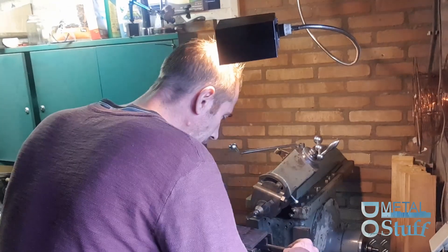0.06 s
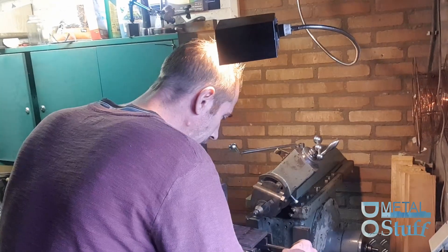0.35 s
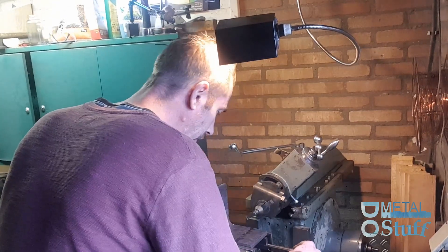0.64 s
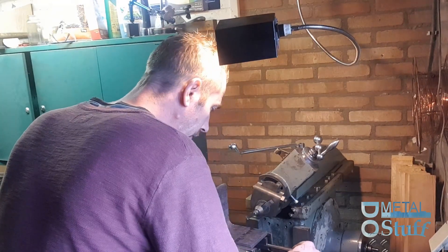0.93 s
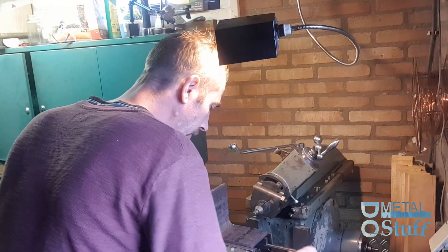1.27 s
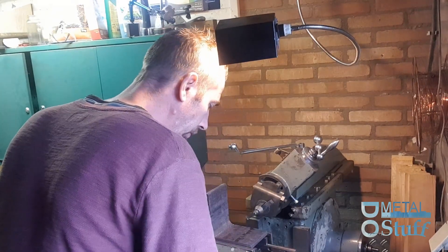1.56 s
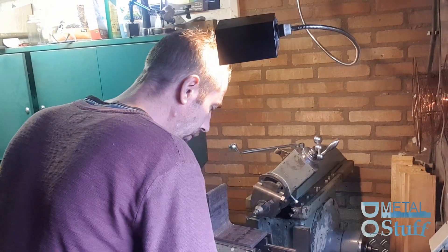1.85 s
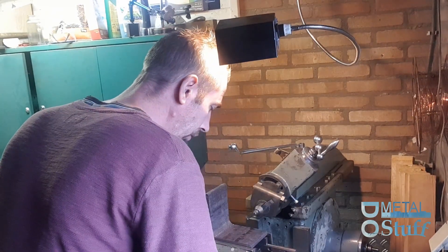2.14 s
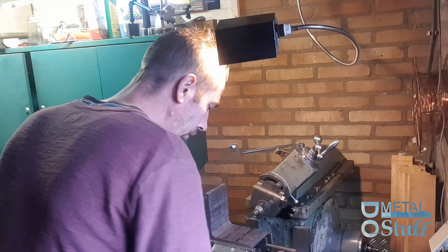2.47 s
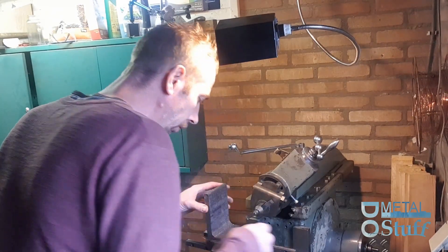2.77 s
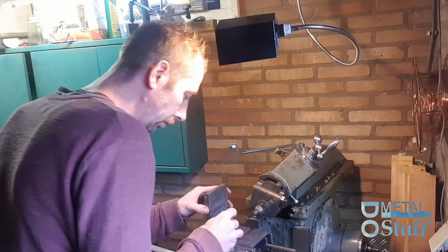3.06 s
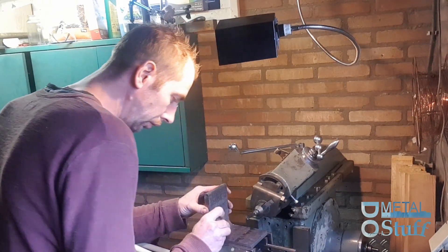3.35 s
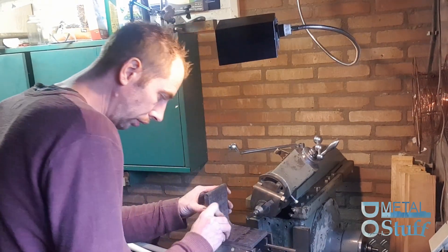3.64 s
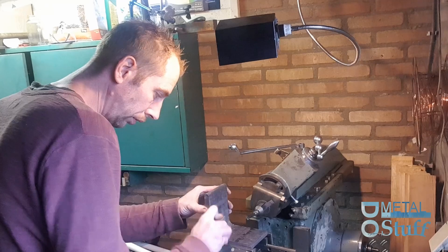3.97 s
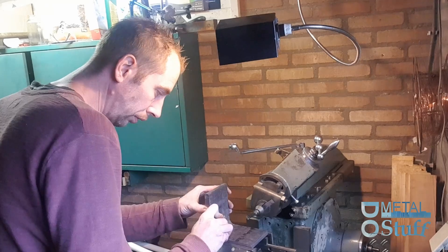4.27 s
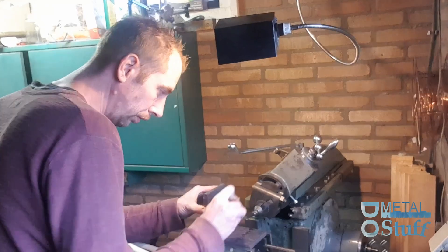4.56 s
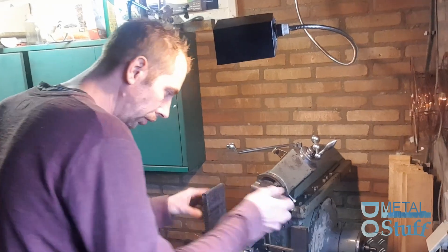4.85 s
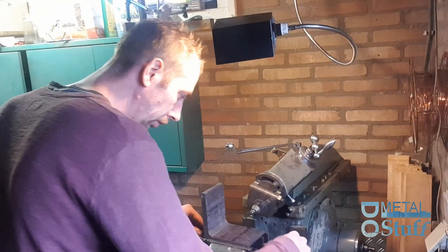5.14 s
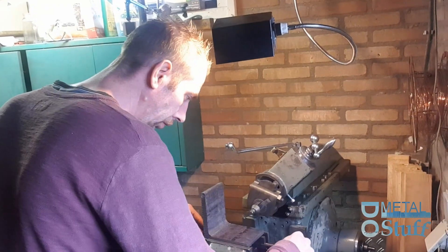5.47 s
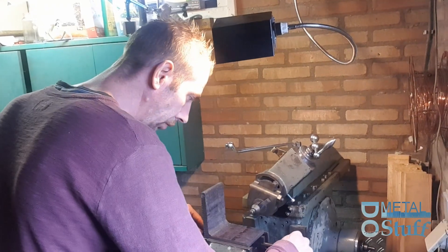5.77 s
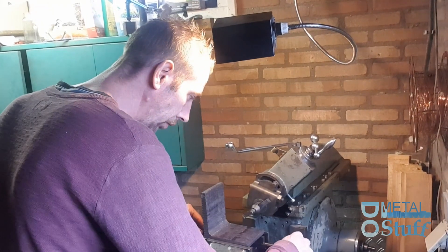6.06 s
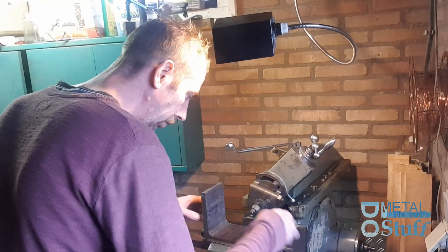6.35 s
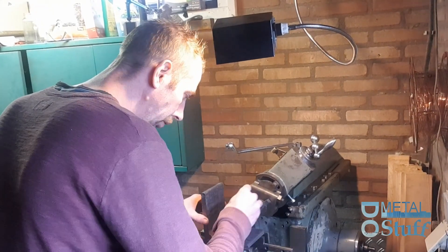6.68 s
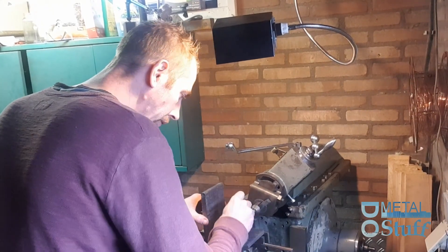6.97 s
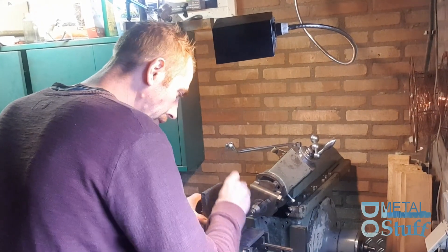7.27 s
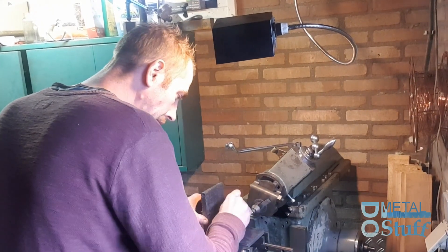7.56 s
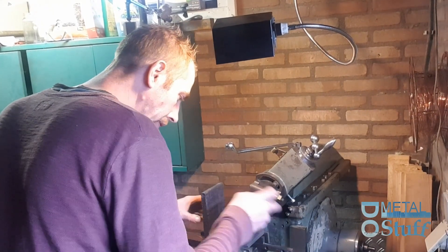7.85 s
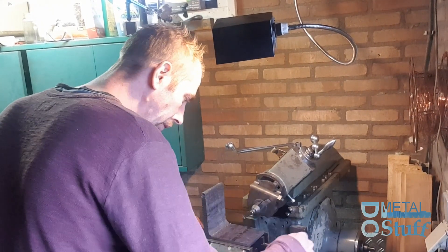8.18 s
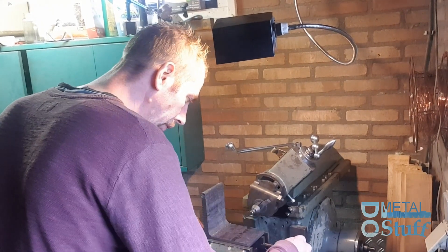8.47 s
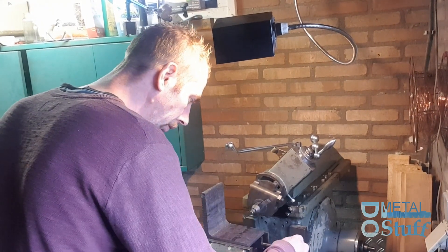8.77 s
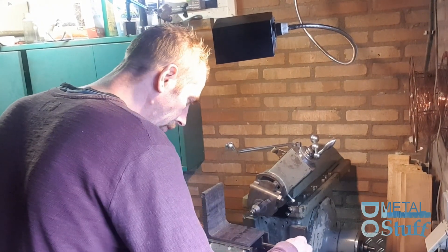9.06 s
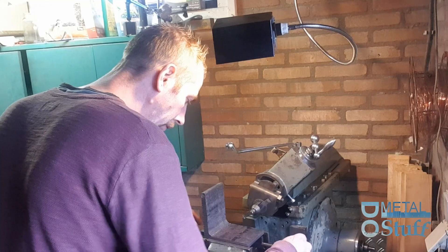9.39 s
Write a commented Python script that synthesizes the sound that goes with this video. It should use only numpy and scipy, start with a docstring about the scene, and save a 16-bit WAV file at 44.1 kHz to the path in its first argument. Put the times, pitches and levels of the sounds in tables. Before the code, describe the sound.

Soft bumps and rubs, then two pairs of sharp metallic clacks as a steel plate shifts on a vise, over faint workshop hum.

```python
"""A faint motor hums with thin whines in a small brick workshop, swelling as the gain control lets go.
From 1.3 s hands nudge a heavy steel angle plate on a machine's vise: soft bumps, rubs, one small tink.
At 3.4 s and 4 s the plate rocks: each corner that lands clacks, rings briefly and thuds the frame.
The gain control ducks the hum after the loud clack, holds, then lets it swell back.
Corners land again at 6.9 s and 7.4 s, the hum ducks once more, and a last soft nudge follows."""
import sys
import numpy as np
from scipy import signal
from scipy.fft import rfft, irfft, next_fast_len
from scipy.io import wavfile
from scipy.ndimage import uniform_filter1d, minimum_filter1d

SR = 44100
rng = np.random.default_rng(int(sys.argv[2]) if len(sys.argv) > 2 else 0)


def transcribe(u):
    """Save the signal u as a 16-bit wav file named by the first command-line argument.

    u: samples, shape (n,) or (channels, n), limited to [-1, 1]; the rate is SR.
    q: integer samples, one column per channel.
    """
    v = np.clip(np.atleast_2d(u).T, -1, 1)
    q = np.round(v * 32767).astype(np.int16)
    wavfile.write(sys.argv[1], SR, q)


N = 415422
TIME = np.arange(N) / SR
AGE = TIME[:SR]   # seconds since a hit


def from_db(db):
    return 10 ** (np.asarray(db) / 20)


def unit_rms(x):
    return x / np.sqrt(np.mean(x ** 2) + 1e-20)


def at_hz(points, hz):
    """Read a curve on a log-frequency axis."""
    f, value = np.transpose(points)
    return np.interp(np.log(np.maximum(hz, 1)), np.log(f), value)


def pan(db):
    """Stereo gains; positive dB leans left."""
    return from_db(np.array([[db], [-db]]) / 2)


def add(out, start_s, sound):
    start = round(start_s * SR)
    out[:, start:start + sound.shape[1]] += sound[:, :N - start]


def butter(x, order, hz, kind):
    return signal.sosfilt(signal.butter(order, hz, kind, fs=SR, output="sos"), x)


def wander(rate_hz, step=100):
    """Smooth random modulation of rms 1."""
    pole = np.exp(-2 * np.pi * step * rate_hz / SR)
    white = rng.standard_normal(N // step + 1002)
    slow = signal.lfilter([1], [1, -2 * pole, pole * pole], white)[1000:]
    return np.interp(np.arange(N) / step, np.arange(len(slow)), unit_rms(slow))


# Stereo image of the room: f/Hz, left-right correlation
STEREO_LIKENESS = [(60, 0.99), (300, 0.6), (450, 0.81), (950, 0.028), (2400, -0.19), (15000, 0.1)]
def stereo_phases(hz):
    """A tone reaches the two microphones in step only in the bass."""
    apart = np.arccos(np.clip(at_hz(STEREO_LIKENESS, hz), -1, 1)) * rng.choice([-.5, .5])
    return rng.uniform(0, 2 * np.pi) + apart * np.array([[1], [-1]])


def room_noise(gain_at, size):
    """Shaped noise of rms 1, near mono in the bass and wide on top."""
    padded = next_fast_len(size)
    hz = np.arange(padded // 2 + 1) * SR / padded
    mid, side = rfft(rng.standard_normal((2, padded)))
    alike = np.clip(at_hz(STEREO_LIKENESS, hz), -1, 1)
    stereo = np.sqrt(1 + alike) * mid + np.sqrt(1 - alike) * side * [[1], [-1]]
    return unit_rms(irfft(stereo * gain_at(hz), padded)[:, :size])


def eq_noise(curve, size=SR):
    """Room noise through an EQ curve."""
    return room_noise(lambda hz: from_db(at_hz(curve, hz)), size)


# Low end of the room tone: f/Hz, level/dB
RUMBLE_EQ = [(18, -36), (45, -14), (78, -5), (100, -9), (125, -11), (165, -18), (260, -28.5), (600, -56)]
def rumble(level_db=-62.5, waver_db=0.9, waver_hz=2.5):
    """A slightly wavering low bed, leaning right."""
    return from_db(level_db + waver_db * wander(waver_hz)) * pan(-7) * eq_noise(RUMBLE_EQ, N)


# Hum bands: f/Hz, width/Hz, level/dB against the air
HUM_BANDS = [(101.2, 7.4, -4), (382.3, 100, -10), (1130, 250, -14), (2024, 64, -14.5)]
def motor_hum():
    """The motor's steady drone: bands of resonant noise."""
    def resonances(f):
        return sum(from_db(db) / np.sqrt(width) / (1 + (2 * (f - hz) / width) ** 2)
                   for hz, width, db in HUM_BANDS)
    level = np.linalg.norm(from_db([db for _, _, db in HUM_BANDS]))
    return level * room_noise(resonances, N)


# Contour of the motor's harmonics: f/Hz, level/dB per harmonic against the air
BUZZ_EQ = [(400, -36), (1150, -34), (1750, -35.5), (1950, -26), (2280, -42.5), (2550, -33.5), (2725, -27.5),
           (3000, -27.5), (3550, -42.5), (3900, -32), (4400, -37.5), (4950, -32), (5700, -53.5),
           (7000, -76)]
# Thin tones above the buzz: f/Hz, level/dB (relative)
WHINE_TONES = [(2024, -17), (2643, -19.5), (2710, -18), (2746, -18.5), (2891, -21.5), (2963, -23),
               (3288, -27.5), (3902, -27), (4227, -29), (4661, -28.5), (4914, -31)]
def motor_buzz(turn_hz=36.13, speed_waver=0.00021, uneven_db=2.5, whine_trim_db=1.0, flicker_db=2.9):
    """Each turn of the motor repeats the same fine rattle; thin whines stand out and flicker."""
    hz = np.arange(1, 190) * turn_hz
    peaks = np.sqrt(2) * from_db(at_hz(BUZZ_EQ, hz) + uneven_db * rng.standard_normal(len(hz)))
    harmonics = peaks * np.exp(1j * np.hstack([stereo_phases(f) for f in hz]))
    size = 8192   # wavetable of one turn
    one_turn = irfft(np.pad(harmonics, ((0, 0), (1, 0))), size) * size / 2
    turns = np.cumsum(turn_hz * (1 + speed_waver * wander(2))) / SR
    buzz = np.array([np.interp(turns % 1 * size, np.arange(size), side) for side in one_turn])
    whines = 0
    for f, db in WHINE_TONES:
        peak = np.sqrt(2) * from_db(db + whine_trim_db + flicker_db * wander(2.2))
        whines += peak * np.sin(2 * np.pi * f / turn_hz * turns + stereo_phases(f))
    return buzz + whines


# Airy part of the room tone: f/Hz, level/dB
AIR_EQ = [(100, -41.5), (170, -14), (253, -7.5), (364, -4.5), (466, -11.5), (643, -8), (1730, -12),
          (1980, -12.5), (2300, -19), (2780, -15.5), (3500, -23.5), (5110, -23), (7770, -49.5),
          (12000, -27), (16000, -27)]
def workshop(air_db=-58.5):
    """The ambience bed: steady air and the motor over the rumble."""
    air = eq_noise(AIR_EQ, N)
    low_bed = rumble()
    return from_db(air_db) * (air + motor_hum() + motor_buzz()) + low_bed


# Hand cues: t/s, bump level/dB, rub level/dB
NUDGE_CUES = [(1.31, -56, -60), (1.42, -58.5, -57), (2.26, -57, -64), (2.979, -64, -76),
              (3.52, -53.5, -58.5), (3.68, -68, -53.5), (7.90, -56, -73)]
# Colours of the bump, the rub and the tink: f/Hz, level/dB
BUMP_EQ = [(40, -30), (78, -1), (130, 2), (200, -11), (420, -7.5), (900, -20), (4000, -66)]
RUB_EQ = [(200, -25), (430, -3), (720, 0), (1000, -7), (2500, -20), (8000, -65)]
TINK_EQ = [(1000, -34), (1750, -8), (1950, -1), (2150, -9), (2350, 5), (2650, -13), (3050, -8), (3400, -20),
           (4200, -17), (6400, -30), (8000, -57)]
def hands(swell_s=0.022, tink_at_s=2.024, tink_db=-44, tink_rise_s=0.00073, tink_t60_s=0.17):
    """Hands shift the plate: cushioned bumps, a little rubbing and one light touch of metal."""
    out = np.zeros((2, N))
    swell = AGE / swell_s * np.exp(1 - AGE / swell_s)
    for start_s, bump_db, rub_db in NUDGE_CUES:
        add(out, start_s, swell * from_db(bump_db) * eq_noise(BUMP_EQ))
        add(out, start_s, swell * from_db(rub_db) * eq_noise(RUB_EQ))
    tink_envelope = (1 - np.exp(-AGE / tink_rise_s)) * from_db(tink_db - 60 * AGE / tink_t60_s)
    add(out, tink_at_s, tink_envelope * eq_noise(TINK_EQ))
    return out


def mode(hz, t60, rise_s, phase):
    """One resonance: it builds as the reflections gather, then dies."""
    envelope = (1 - np.exp(-AGE / rise_s)) * from_db(-60 * AGE / t60)
    return envelope * np.sin(2 * np.pi * hz * AGE + phase)


# Boom of the machine's frame and the room: f/Hz, level/dB, t60/s
FRAME_MODES = [(52.1, -43, 0.91), (76.8, -25.5, 0.54), (89.5, -29, 0.17), (112, -35.5, 0.59),
               (151.6, -41, .3)]
def frame_thud(rise_s=0.0095):
    """Close low modes start against each other and beat as they fade."""
    boom = sum(from_db(db) * mode(hz, t60, rise_s, np.pi * k)
               for k, (hz, db, t60) in enumerate(FRAME_MODES))
    return pan(-2.5) * butter(boom, 2, 40, "high")


# The plate's ring in the vise: f/Hz, t60/s, pan/dB, level/dB when struck at corner A, B, C, D
STEEL_MODES = [(287, 0.18, 2, -28, -24, -14, -11.5), (385, 0.15, -1.5, -34, -20, -35, -27),
               (460, 0.18, 5, -24, -16.5, -32.5, -21.5), (684, 0.11, 8, -17, -16.5, -28, -27),
               (833, 0.65, 9, -57, -49, -57.5, -39), (1065, 0.2, -5, -56, -36, -41, -25),
               (1163, 0.2, -4, -46, -30, -31, -22.5), (1335, 0.16, -5, -27, -30, -20, -22),
               (1470, 0.28, 3, -41, -31, -39, -37), (1590, 0.11, -3, -23, -24, -27, -25.5),
               (2101, 0.11, -5, -45, -24.5, -12.5, -19), (2206, 0.11, -2.5, -40, -18, -29, -21),
               (2645, 0.14, 7, -48, -23, -24, -17.5), (2812, 0.11, 0, -42, -20.5, -18, -20),
               (3022, 0.15, -4.5, -42, -22, -15, -16.5), (3075, 0.15, 2, -42, -18.5, -18, -16),
               (3248, 0.12, 1, -43, -12, -24, -16), (3445, 0.12, 8, -57, -14, -35, -20),
               (3644, 0.12, 0, -60, -15, -44, -24), (4620, 0.12, 0, -42, -23, -42, -30),
               (5100, 0.12, -3, -47, -24, -40, -25), (5482, 0.145, -10, -54, -26, -30.5, -18),
               (6720, 0.13, -6, -52, -26, -39, -33), (8070, 0.16, -2, -72, -42, -47, -52),
               (8697, 0.2, -2, -79, -35, -53, -26.5), (9787, 0.12, 8, -76, -21, -59, -26),
               (11520, 0.11, 1, -57, -28, -39, -28), (13460, 0.11, 1, -65, -28, -52, -26),
               (14490, 0.1, -3.5, -63, -24.5, -43, -32)]
def steel_ring(corner, rise_s=0.0039, rise_cycles=0.94):
    """The corner that lands sets each mode's share; low modes take longer to build."""
    out = 0
    for hz, t60, pan_db, *struck_db in STEEL_MODES:
        gain = from_db(struck_db["ABCD".index(corner)]) * pan(pan_db)
        out += gain * mode(hz, t60, rise_s + rise_cycles / hz, stereo_phases(hz))
    return out


def contact_db(hz, level_db, tilt_db, contact_s, pivot_hz=2000, steepness=5.4, grit_db=-20):
    """A light touch tilts towards the treble; a long soft contact cuts it, all but a little grit."""
    octaves = np.log2(np.maximum(hz, 500) / pivot_hz)   # the bass stays flat
    cushioned = from_db(tilt_db * octaves) ** 2 / (1 + np.abs(hz * contact_s) ** steepness)
    return level_db + 10 * np.log10(cushioned + from_db(grit_db) ** 2)


def crack(contact, fade_s=.0022, band_hz=(900, 4100), top_hz=6200):
    """The direct sound of the contact: a bright burst, gone in a few milliseconds."""
    fade = np.exp(-AGE / fade_s)
    burst = butter(room_noise(np.ones_like, SR) * fade, 2, band_hz, "band")
    burst = unit_rms(butter(burst, 6, top_hz, "low"))
    hz = np.arange(SR + 1) / 2
    spectrum = rfft(burst, 2 * SR) * from_db(contact_db(hz, *contact))
    return irfft(spectrum)[:, :SR] * np.sqrt(np.mean(fade ** 2))


def mode_ripple(hz, spacing_hz=50, ripple_db=1.5, full_above_hz=5000):
    """Many small modes of uneven strength; they stand out most in the treble."""
    grid = np.arange(400) * spacing_hz
    strengths = np.clip(rng.standard_normal(len(grid)), -2, 2)
    depth_db = ripple_db * np.minimum(hz / full_above_hz, 1)
    gain = from_db(depth_db * np.interp(hz, grid, strengths))
    return gain / np.sqrt(uniform_filter1d(gain ** 2, size=900))


# Bell boost on the clack, by corner: f/Hz, level/dB, width/octaves
CORNER_BITE = {"A": (4600, 15, 0.15), "B": (3600, 6, 0.36), "C": (3300, 5.5, .15), "D": (1230, 6.5, 0.33)}
def bite_db(hz, corner):
    """The broad resonance that this corner excites most."""
    centre_hz, peak_db, width = CORNER_BITE[corner]
    octaves = np.log2(np.maximum(hz, 1) / centre_hz)
    return peak_db * np.exp(-(octaves / width) ** 2 / 2)


# The plate's dense, short-lived modes, blurred by the room: f/Hz, level/dB
CLACK_EQ = [(60, -14), (210, -10.5), (380, -2), (560, -3), (900, -4.5), (1300, -0.5), (2100, -3), (3000, 0),
            (4300, -7.5), (6400, -10), (7700, -27), (10500, -20), (13500, -13), (16000, -23.5)]
# Their place in the stereo field: f/Hz, pan/dB
CLACK_IMAGE = [(300, -0.5), (650, 4), (1100, 0.5), (3200, 2), (4400, -1), (5800, -11), (9000, 1),
               (14000, 1.5)]
# Their tails, by band: f/Hz, t60/s
CLACK_TAILS = [(150, .25), (500, 0.2), (1300, 0.15), (3000, 0.16), (6000, .14), (13000, 0.13)]
def clack(corner, contact, hold_s=0.014, rise_cycles=2.3, slap=0.34, slap_s=.011, slap_width_s=0.0025):
    """A dense ring, swelled by a slap back from the wall, that dies sooner in the treble."""
    hz = np.arange(SR // 2 + 1)
    image_db = at_hz(CLACK_IMAGE, hz) * [[.5], [-.5]]
    colour = from_db(contact_db(hz, *contact) + bite_db(hz, corner) + image_db)
    spectrum = rfft(eq_noise(CLACK_EQ)) * colour * mode_ripple(hz)
    centres = [centre for centre, _ in CLACK_TAILS]
    decay_age = np.hypot(AGE, hold_s) - hold_s   # a short hold rounds off the peak
    out = 0
    for (centre, t60), solo in zip(CLACK_TAILS, np.eye(len(centres))):
        crossover = at_hz(list(zip(centres, solo)), hz)
        attack = 1 - np.exp(-AGE * centre / rise_cycles)
        out += irfft(spectrum * crossover) * attack * from_db(-60 * decay_age / t60)
    return out * (1 + slap * np.exp(-((AGE - slap_s) / slap_width_s) ** 2))


# Hit cues, levels before the layer trims: t/s, corner, crack and clack level/dB,
# tilt/(dB per octave), contact time/s, ring level/dB, thud level/dB
LANDING_CUES = [ (3.3853, "A", -11.5, -1, 0.00057, -1.5, -14), (4.0125, "B", 0.5, 0.3, .00002, 8, 6),
                (4.0191, "B", 1, 2.5, .00003, -13.5, -13.5), (6.917, "C", -3.5, 4.5, 0.00046, 1.4, -13),
                (7.418, "D", 5, 0.73, .00003, 5, 4.5), (7.586, "D", -33.5, 7.5, .00005, -35.5, -35.5)]
def rocking_plate(crack_trim_db=-6.5, clack_trim_db=-14.5, ring_trim_db=-1.5):
    """Each corner landing on the vise stacks four layers: crack, clack, ring and thud."""
    out = np.zeros((2, N))
    for start_s, corner, *contact, ring_db, thud_db in LANDING_CUES:
        add(out, start_s, from_db(crack_trim_db) * crack(contact))
        add(out, start_s, from_db(clack_trim_db) * clack(corner, contact))
        add(out, start_s, from_db(ring_trim_db + ring_db) * steel_ring(corner))
        add(out, start_s, from_db(thud_db) * frame_thud())
    return out


def scene():
    return rocking_plate() + hands() + workshop()


def gain_control(x, threshold_db=-19.5, share=0.54, hold_s=2.3, release_db_per_s=13, look_ahead_s=.012):
    """A loud clack ducks everything at once; after the hold the background swells back."""
    sidechain = butter(x, 2, 2240, "high")
    power = uniform_filter1d(np.mean(sidechain ** 2, axis=0), round(.02 * SR))
    treble_db = 10 * np.log10(np.abs(power) + 1e-20)
    duck_db = share * np.maximum(treble_db - threshold_db, 0)
    hold = round(hold_s * SR)
    held_db = -minimum_filter1d(-duck_db, hold, origin=(hold - 1) // 2, mode="constant")
    held_db = np.maximum(held_db, 6.5 * (TIME < 0.67))   # the scene opens already ducked
    ramp_db = release_db_per_s * TIME
    released_db = np.maximum.accumulate(held_db + ramp_db) - ramp_db
    return x * from_db(-np.interp(TIME + look_ahead_s, TIME, released_db))


def record(dry, cutoff_hz=15900):
    """The gain control rides the level, peaks clip at full scale, the top is cut."""
    clipped = np.clip(gain_control(dry), -1, 1)
    return signal.sosfilt(signal.ellip(10, .1, 80, cutoff_hz, fs=SR, output="sos"), clipped)


dry = scene()
out = record(dry)
transcribe(out)
```